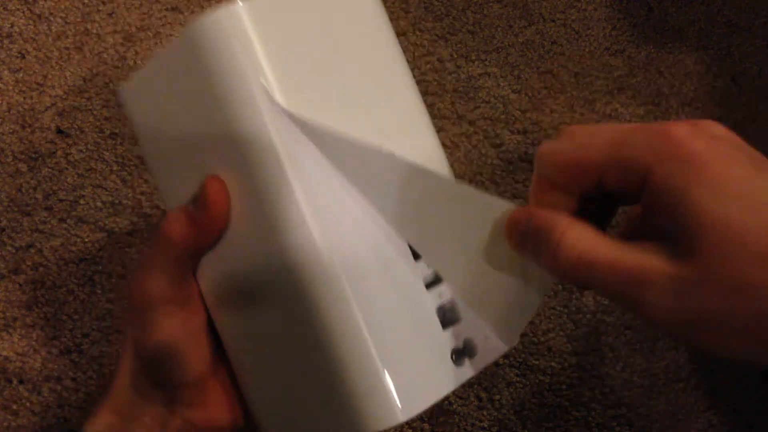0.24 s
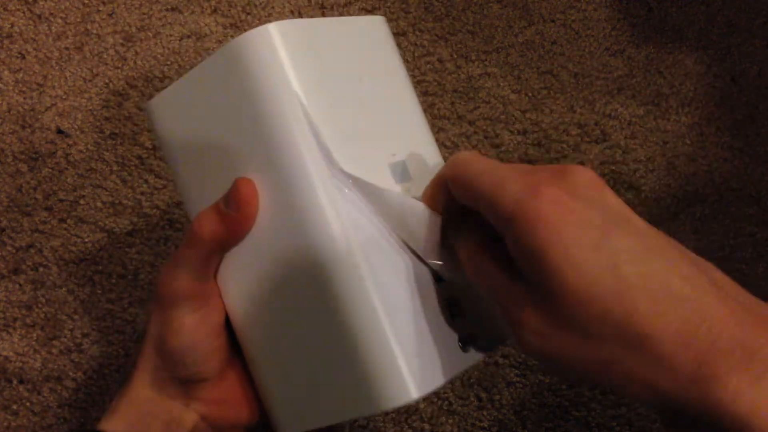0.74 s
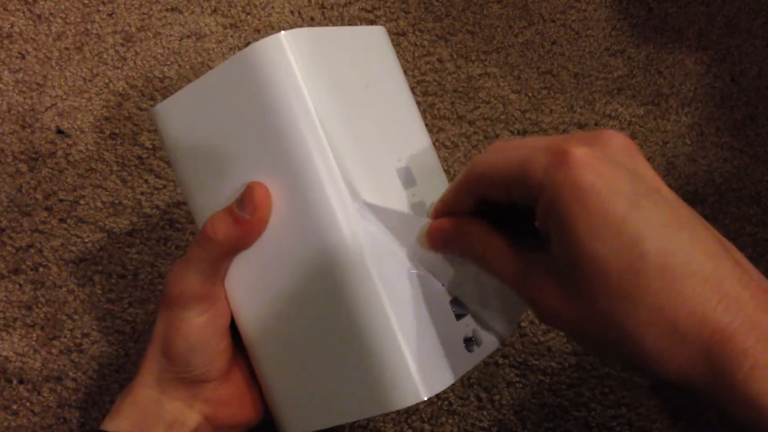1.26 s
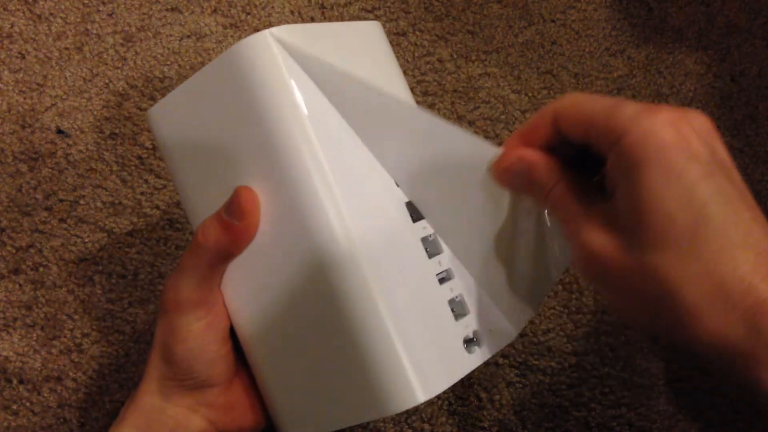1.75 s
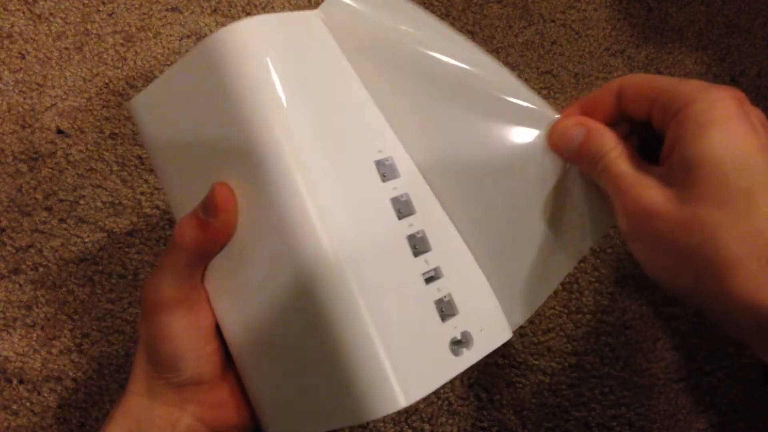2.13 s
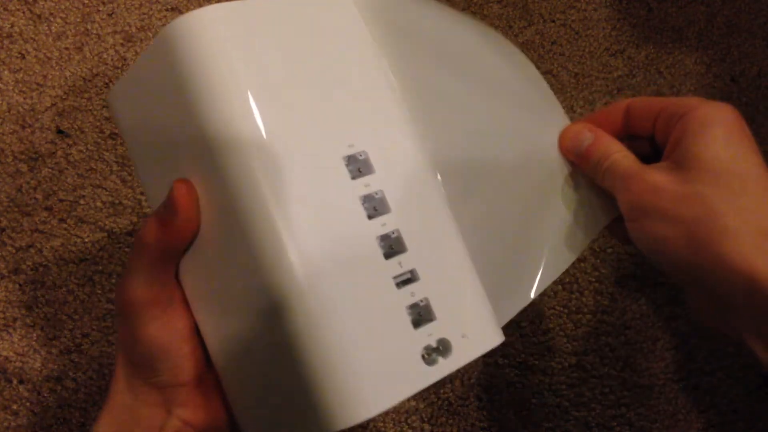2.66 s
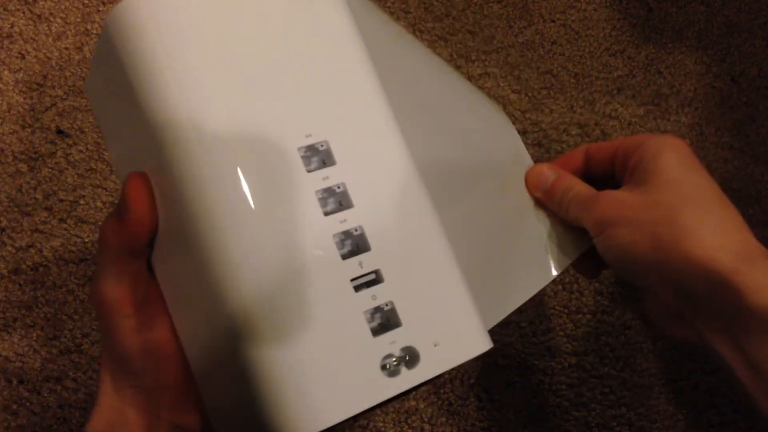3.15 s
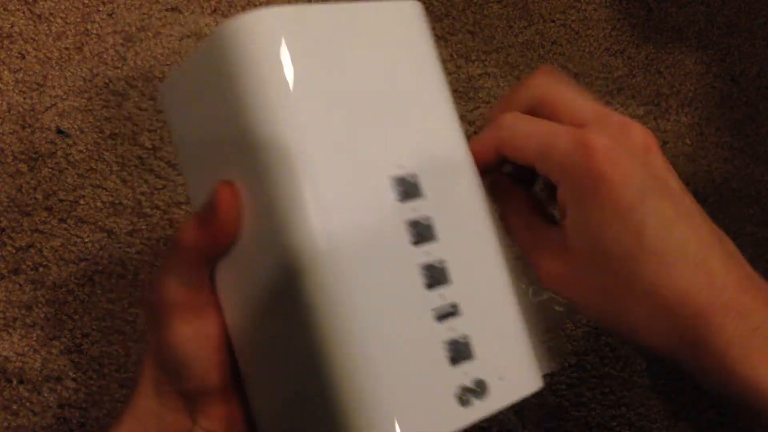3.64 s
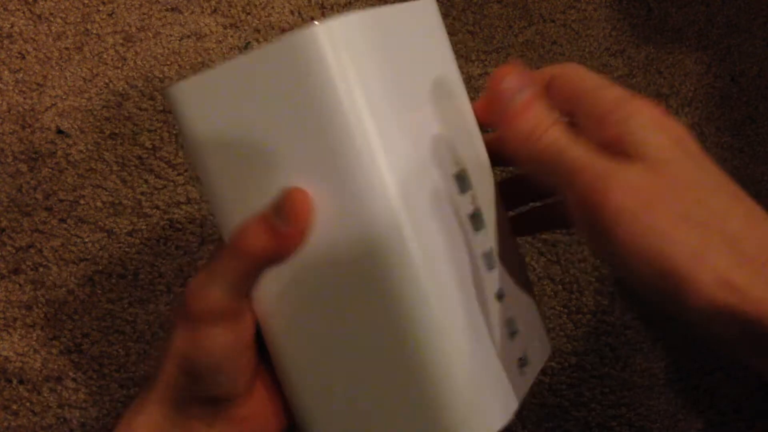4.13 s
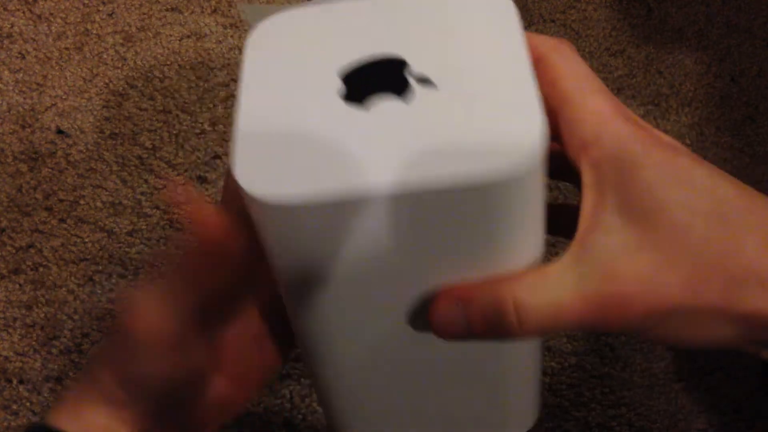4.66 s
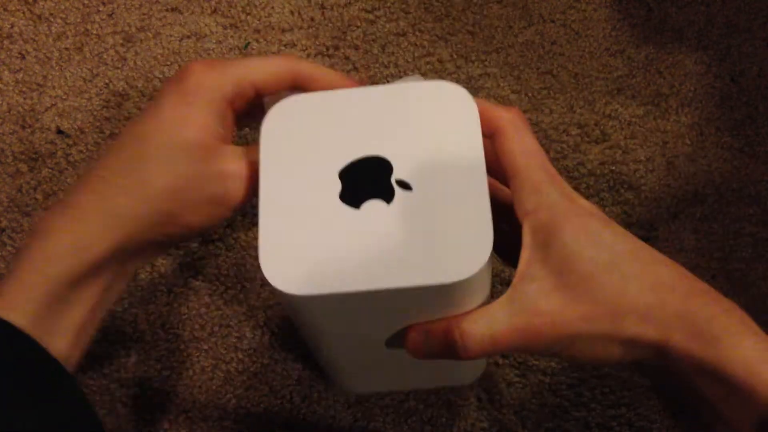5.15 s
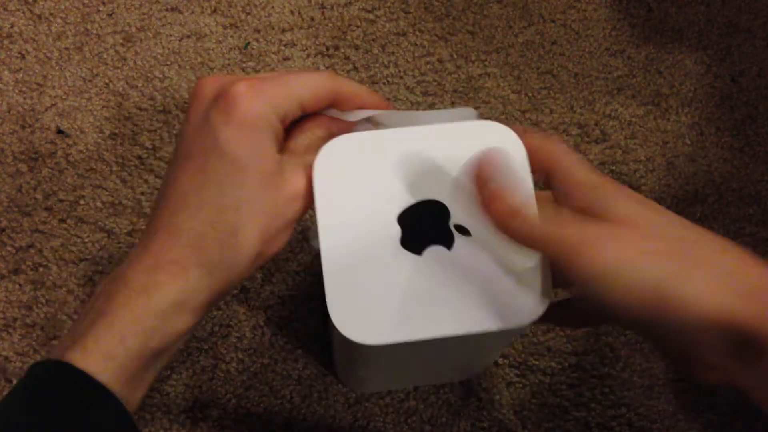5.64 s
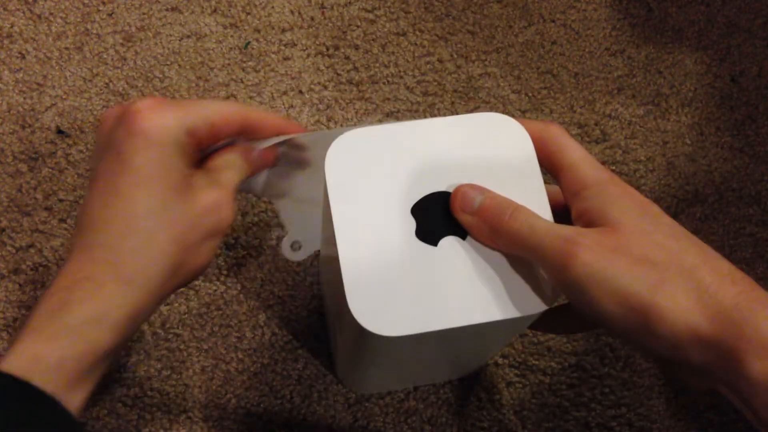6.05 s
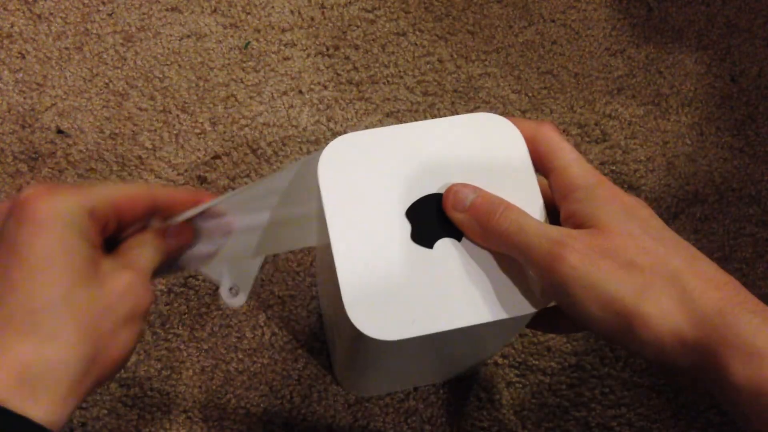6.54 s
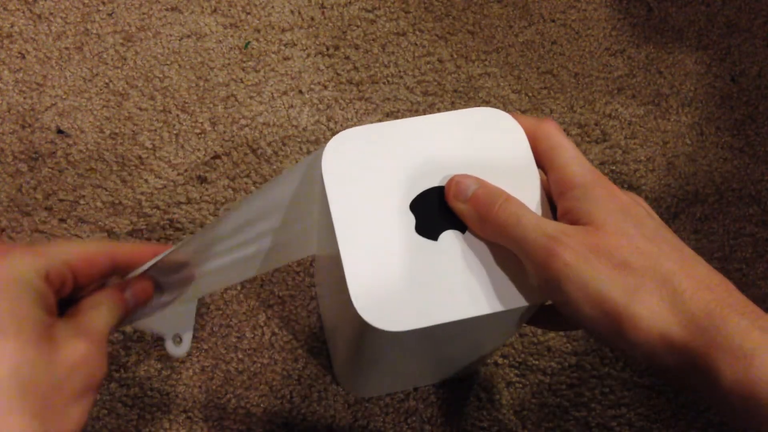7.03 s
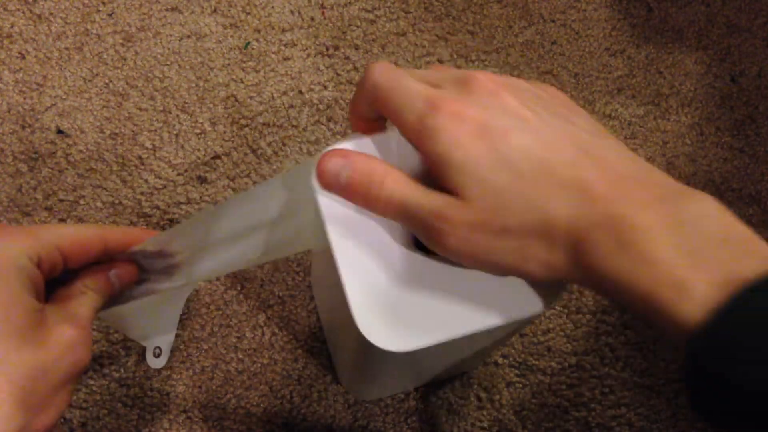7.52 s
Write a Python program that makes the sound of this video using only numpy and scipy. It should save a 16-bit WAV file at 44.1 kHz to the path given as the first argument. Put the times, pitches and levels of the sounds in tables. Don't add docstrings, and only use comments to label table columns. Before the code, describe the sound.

Sharp snaps and crinkles of protective plastic film coming off a hollow plastic case, with brief rubbing, quiet gaps and a faint peeling hiss indoors.

```python
import sys
import numpy as np
from scipy import signal
from scipy.fft import rfft, irfft, next_fast_len
from scipy.io import wavfile
from scipy.ndimage import uniform_filter1d, map_coordinates

SR = 44100
rng = np.random.default_rng(int(sys.argv[2]) if len(sys.argv) > 2 else 0)


def ratio(d):
    e = np.asarray(d, float) / 20
    return 10 ** e


def unload_audio(sound):
    columns = np.transpose(np.atleast_2d(sound))
    steps = np.round(np.clip(columns, -1, 1) * 32767)
    wavfile.write(sys.argv[1], SR, steps.astype(np.int16))


N = 343315

POPS = [
    (1.4092, 2.5, -8, -5.5),
    (2.5171, .5, -3.5, .3),
    (2.821, -1, -5, 3),
    (5.4479, -10, -17, 9),
    (6.2035, -3, -8, 6.5),
]
CRACKS = [(.5718, -7.5, -5, -16.5), (.7708, -23, 0, -17.5), (.8523, -22.5, 7.5, -10.5),
          (1.5161, -26, 13, -13.5), (1.9258, -10, -1, -12.5), (3.463, -17.5, -5.5, -13),
          (3.6613, -18, -8, -13.5), (3.8236, -38.5, -9, -10), (3.9762, -27, 20.5, -8), (4.5794, -47, 6, -7),
          (4.6537, -13.5, -21, -10.5), (5.4635, -10, -14, 0), (5.9294, -10.5, -16, -2),
          (6.1042, -31, -16, -12), (6.1951, -34, -10, -4), (6.4076, -15, -13, -4), (6.417, -28.5, -14, 9),
          (6.621, -45, -17, 19), (6.8121, -25.5, -8, -12), (7.2971, -27, -12.5, -6.5)]
SNAPS = [(.306, -49.5, 14, -13), (1.1096, -19.5, -6.5, -11.5), (1.1697, -42, 14.5, -24.5),
         (2.136, -9.5, -2, -17), (2.84, -26, -10, -4), (6.482, -22, 0, 12), (1.4165, -17, -4, -5),
         (1.441, -29, -2, -6), (3.4417, -23.5, 2, -12), (3.915, -30, 2, -16), (4.5471, -41, 1, -1),
         (5.0003, -36, 9, -16), (5.0081, -27, 4, -10), (5.0771, -13, -2.5, -26), (5.3129, -25, -3, -19.5),
         (5.4552, -20, -10, -3), (5.518, -31, -20, 3), (5.5635, -6, -16, -4), (5.6054, -11, -13, -2.5),
         (5.671, -14, -8, 1), (5.9028, -9.5, -12, 3.5), (6.4003, -6.5, -15, -4), (6.4476, -17.5, 5, -15.5),
         (6.5236, -23, -20, 6), (7.2353, -11.5, -11, -12), (7.4885, -27, -11, -11.5)]
THUMPS = [
    (.1973, -20, 0, -13.5),
    (.5978, -19, -7, -12),
    (1.2431, -28.5, 4, -12),
    (2.8742, -24, -9, -9),
    (5.7402, -19.5, -6, -20),
]
CRUNCHES = [(.3822, -36, 3.5, -8.5), (.579, -18, 0, -8), (.6293, -36, -4, -12), (.7042, -26, -1, -8),
            (.7178, -12.5, -3, -6), (.8835, -7, -9, -11), (.8896, -3.5, -8, -21),
            (.9179, -13.5, 2.5, -12.5), (.9338, -18, 2, -14), (1.03, -38, 4, -12.5), (1.085, -33, 10.5, 1),
            (3.43, -12.5, -2.5, -10.5), (4.069, -24, -10, -20), (4.8943, -1, -13, -13.5),
            (4.9179, -9, -13, -16), (4.9503, -14, -6, -21), (5.298, -9.5, -14, -15), (5.5376, -30, -3, -13),
            (5.6368, -9, -16, -12), (5.712, -31.5, 5, -13), (5.9445, -7, -14, -10),
            (5.9563, -10.5, -8.5, -28), (5.9792, -19, -15, -8), (6.1872, -39, -20, -4), (6.49, -33, 0, 11),
            (6.5118, -44.5, 1, 8.5), (6.7196, -46, 1, 10), (7.5958, -36.5, 6, -11)]
FOLDS = [(.7357, -29, -4, 3), (.843, -28, 0, -8), (2.5338, -21.5, -12, -21.5), (3.4117, -21.5, 1, -13),
         (3.6671, -8.5, 0, -19), (3.6975, -29, 5, -8), (3.702, -11, -4, -26), (4.6593, -18, -15, -11.5),
         (4.6956, -25.5, 1, -22), (4.7062, -36, 6, -7), (5.0251, -12, -12, -16), (5.0344, -21, 6, -17.5),
         (5.0636, -12.5, -5, -20), (5.269, -21, -6, -10), (5.6426, -16, -.4, -19), (5.7827, -27.5, 3, -8),
         (6.22, -13, -19.5, -8), (6.4304, -18, -20, -4), (6.6069, -43, -16, 8), (7.51, -34, 3, -14)]
TICKS = [(0.56, -46, 0, -9), (0.669, -39, 2, -5), (1.7646, -47.5, -10, 12), (2.494, -43.5, -13, -1.5),
         (4.1485, -47, 15, -11), (4.3068, -38, 7, -16), (4.3618, -35, 1, -18), (4.5562, -45, 18, -3),
         (5.119, -43, 9.5, -9), (5.3731, -32, -7, -14), (5.4358, -32, -11, -7), (5.8478, -28.5, -8, -22),
         (5.8906, -44, -3, 2), (6.0966, -39, -4, 5), (6.1201, -39, -17, 2), (6.1745, -30, 2, -16),
         (6.166, -36, -12, -2), (6.3334, -29.5, -9, -7.5), (6.3894, -32.5, -4, -4), (7.444, -38.5, -1, -6),
         (7.586, -38, -0.5, -6), (7.763, -40, -6, -4)]


def creases():
    # (rows, rattle t60/s, low end/dB under the body); pops must come first
    kinds = [(POPS, .0075, -6), (CRACKS, .015, -13), (SNAPS, .023, -8), (THUMPS, .026, 6),
             (CRUNCHES, .036, -11), (FOLDS, .055, -6), (TICKS, .014, -14)]
    low_per_body = .7
    return np.array([(s, db, under + low_per_body * body, body, bright, t60)
                     for rows, t60, under in kinds
                     for s, db, body, bright in rows])


CREASE_HZ = [40, 100, 480, 900, 1500, 4200, 10000, 13500, 15300]
# (f/Hz, width/Hz, level/dB)
SHEET = [(3500, 260, 4), (5610, 590, 3.5), (6970, 400, 5), (8260, 450, 4), (11600, 390, 2)]
# (f/Hz, width/Hz, level/dB)
PANELS = [
    [(1050, 250, 9), (2540, 350, 5), (3850, 450, 10), (5260, 350, 6), (6700, 400, 6), (9870, 600, 3)],
    [(2200, 500, 8), (3500, 400, 2), (5900, 900, 8), (8200, 800, 6), (11500, 1100, 6), (13700, 600, 6)],
    [(3450, 700, 7), (5400, 600, 5), (6790, 350, 4), (8400, 900, 8), (10100, 500, 4), (11800, 700, 4)],
    [(3200, 600, 3), (4600, 500, 2), (6000, 600, 2), (8300, 900, 4), (10500, 900, 3), (12500, 900, 3)],
    [(3630, 300, 4), (4910, 300, 5), (6900, 900, 8), (9000, 1100, 7), (11500, 800, 4), (13100, 500, 4)],
]


def crease_colours(rows, hz):
    colours = []
    for _, db, low, body, bright, _ in rows:
        dark, shiny = min(bright, 0), max(bright, 0)
        levels = [low - 30, low - 13, low + 1, (low + body) / 2 - 2.5, body + 1.5, 0,
                  bright, bright + .6 * dark - .6, bright - .6 * shiny + 1.2 * dark - 7]
        colours.append(along(list(zip(CREASE_HZ, levels)), hz) + db + 4.5)
    woken = rng.uniform(0.12, 1.15, (len(rows), len(SHEET)))
    woken[:len(POPS)] *= .3
    colours = np.array(colours) + woken @ humps(SHEET, hz)
    for pop, panel in enumerate(PANELS):
        colours[pop] += humps(panel, hz).sum(axis=0) - 1.7
    return colours


def rattles(life, size):
    t = np.arange(SR // 16) / SR
    after_slips = ratio(3.5 * rng.standard_normal((len(life), len(t) // 32 + 1)))
    uneven = after_slips.repeat(32, axis=1)[:, :len(t)]
    fall = uneven * (ratio(-60 * t / (0.99 * life)) + 0.15 * ratio(-60 * t / (5 * life)))
    rise = 1 - np.exp(-(t + 1 / SR) / life ** 2)
    rattle = rfft(rng.standard_normal(fall.shape) * fall * rise, size)
    return rattle / np.sqrt(uniform_filter1d(abs(rattle) ** 2, size=420))


def snaps(room_db):
    rows = creases()
    count, size, lead = len(rows), 12288, 64
    hz = np.fft.rfftfreq(size, 1 / SR)
    is_pop = (np.arange(count) < len(POPS))[:, None]
    life = rows[:, 5:]
    rattle = rattles(life, size)
    flip = np.where(is_pop, .84, np.clip(.95 - life / .05, 0, .7))
    lag = rng.uniform(.00015, .0011, (count, 3, 1))
    echo = np.where(is_pop, .12, .3)
    click = 0.8 + echo * ([-1, 1, -1] @ np.exp(-2j * np.pi * hz * lag))
    answer = rfft(np.pad(tails(count), ((0, 0), (120, 0))), size)
    wet_db = room_db + np.where(is_pop, -4, 0)
    snap = np.sqrt(flip) * click + np.sqrt(1 - flip) * rattle + ratio(wet_db) * answer
    heard = np.roll(irfft(snap * causal(crease_colours(rows, hz))), lead, axis=1)
    at = np.round(rows[:, :1] * SR).astype(int) - lead + np.arange(size)
    return np.bincount(at.ravel(), heard.ravel(), N)[:N]


# (t/s, peak level/dB, f/Hz, t60/s)
BOOMS = [(0.195, -38, 299, 0.094), (.197, -46, 520, .03), (.198, -50, 930, .06), (.198, -50, 1120, .11),
         (.198, -48, 1733, .08), (.198, -54, 2100, .05), (2.14, -54, 105, .08), (1.38, -62, 520, .02),
         (1.47, -60, 520, .04), (0.884, -37, 185, 0.035), (1.41, -27.5, 1013, 0.023),
         (1.409, -33, 3750, .03), (1.516, -48, 555, 0.05), (1.515, -42, 1830, 0.033),
         (2.14, -52, 360, 0.17), (.572, -35, 2250, .03), (6.204, -40, 600, .02), (.722, -48, 450, .03),
         (2.137, -43, 1900, .065), (2.138, -52, 1170, .1), (2.136, -46, 450, .03), (1.516, -47, 2250, .05),
         (1.518, -55, 1940, .08), (2.878, -52, 1250, .05), (2.875, -50, 2950, .04), (.653, -53, 260, .03),
         (.725, -54, 229, 0.061), (.93, -54, 170, .07), (2.518, -42.5, 221, 0.17), (2.518, -43, 542, 0.059),
         (3.108, -56.5, 590, 0.025), (3.67, -43, 400, 0.039), (4.6, -59, 70, .15), (4.895, -25, 5170, .03),
         (5.077, -39, 3670, .03), (5.741, -40.5, 252, 0.035), (5.943, -45, 160, 0.073),
         (6.402, -49, 248, 0.037), (6.401, -23, 7080, .06), (6.4, -24, 8630, .05), (1.409, -38, 2600, .03),
         (1.409, -30, 5230, .02), (6.417, -36, 7100, 0.15), (5.741, -42, 540, .025),
         (3.977, -43, 560, .025), (3.43, -45, 340, .03), (1.926, -47, 330, .03)]


def booms():
    u = np.arange(SR // 4) / SR
    out = np.zeros(N + SR)
    for s, db, hz, t60 in BOOMS:
        drift = uniform_filter1d(rng.standard_normal(len(u)), size=60)
        wander = 1 + .36 * np.clip(hz / 3000, 1, 3) * drift
        swing = np.sin(2 * np.pi * hz * np.cumsum(wander) / SR)
        soft_start = 1 - np.exp(-u * hz / 0.23)
        out[round(s * SR):][:len(u)] += ratio(db - 60 * u / t60) * swing * soft_start
    return out[:N]


EDGE_DB = -11
# (middle t/s, half length t/s, drag level/dB, crispness level/dB)
RUSTLE = [(.385, .015, -72, -4), (.42, .03, -80, 10), (.66, .02, -70, 0), (1.39, .02, -65, -2),
          (2.89, .03, -60, -12), (3.475, .03, -56, 0), (3.525, .025, -66, -20), (3.58, .03, -66, -17),
          (3.632, .025, -55, -8), (3.655, .008, -47, -2), (3.735, .015, -51, -4), (3.685, .05, -48.5, -10),
          (3.786, .012, -55, -3), (3.81, .04, -60, -8), (3.848, .015, -51, -10), (3.88, .025, -54, -15),
          (3.94, .04, -53, -11), (3.99, .04, -50, -3), (4.028, .032, -49.5, 1), (4.056, .016, -45, 4),
          (4.155, .025, -67, -10), (4.22, .05, -63, -12), (4.325, .035, -64, -10), (4.375, .025, -64, -3),
          (4.43, .035, -65, -8), (4.468, .015, -67, 0), (4.57, .045, -65, -6), (4.62, .025, -66, -6),
          (4.7, .05, -57, -9), (4.83, .03, -76, 12), (5.1, .03, -62, -12), (5.19, .025, -68, 3),
          (5.295, .03, -62, 11), (5.37, .03, -70, 3), (5.435, .02, -77, 14), (7.51, .04, -64, 5),
          (7.6, .04, -69, -4)]


def strokes():
    s, half, db, crisp_db = np.transpose(RUSTLE)
    u = (np.arange(0, N, 32)[:, None] / SR - s) / half + .25
    catch, let_go = 2.2, .85
    swell = ratio(EDGE_DB * np.where(u < 0, catch * u, let_go * u) ** 2)
    return [(swell @ ratio(level)).repeat(32)[:N] for level in (db, db + crisp_db)]


# (f/Hz, level/dB per Hz)
DULL = [(90, -40), (400, -4), (850, -5), (1700, -2), (2800, -2.5), (4500, -6.5), (7000, -35), (12000, -60)]
# (f/Hz, level/dB per Hz)
BRIGHT = [(1500, -34), (3000, -11), (4500, 0), (6500, -5.5), (9000, -16.5), (15000, -28)]


def rustle():
    clumps = ratio(2.5 * wobble(120))
    drag_gain, crinkle_gain = strokes()
    drag = clumps * crinkle(per_second=900, spread_db=3, noise=1.1)
    skin = ratio(-1.2) * coloured(drag, DULL)
    sheet = coloured(clumps * crinkle(per_second=1300, spread_db=4, noise=0.6), BRIGHT)
    return clumps * pockets() + ratio(-2.5) * drag_gain * skin + ratio(-3.5) * crinkle_gain * sheet


# (middle t/s, half length t/s, level/dB, f/Hz)
POCKETS = [(3.475, .03, -62, 1300), (3.525, .03, -66, 1300), (3.585, .012, -66, 1600),
           (3.61, .02, -70, 1300), (3.65, .03, -64, 420), (3.635, .02, -60, 1800), (3.656, .007, -50, 3400),
           (3.7, .015, -50, 2300), (3.735, .015, -55, 2400), (3.775, .02, -62, 2600), (3.81, .02, -70, 450),
           (2.9, .03, -68, 600), (3.81, .025, -64, 2800), (3.89, .008, -58, 3200), (3.68, .025, -57, 330),
           (3.97, .05, -60, 4200), (4.58, .005, -62, 2250), (3.848, .012, -58, 2400),
           (3.868, .012, -52, 1600), (3.888, .01, -53, 1800), (3.872, .03, -62, 3200),
           (3.922, .018, -51.5, 1500), (3.955, .025, -52.5, 1900), (3.95, .03, -60, 3000),
           (4.005, .015, -60, 700), (4.02, .015, -54, 4400), (4.06, .02, -52, 3300),
           (4.155, .013, -65, 2100), (4.165, .012, -67, 1700), (4.205, .02, -68, 2000),
           (4.25, .02, -70, 1550), (4.33, .02, -68, 2100), (4.368, .018, -65, 4300),
           (4.38, .012, -65, 1900), (4.43, .022, -72, 1600), (4.47, .015, -69, 3400),
           (4.565, .022, -67, 2100), (4.62, .015, -69, 2100), (4.67, .015, -60, 3200),
           (4.705, .02, -63, 1900), (4.75, .01, -66, 3100), (5.12, .008, -66, 1400),
           (5.195, .012, -69, 1650), (5.18, .03, -67, 3300), (5.3, .015, -50, 4600),
           (5.538, .008, -62, 1300),
           (.46, .006, -66, 2000), (.562, .004, -67, 3000), (.7145, .003, -50, 9000),
           (.737, .01, -54, 13000), (.878, .006, -54, 4000), (.89, .009, -39, 6000), (.9, .03, -60, 260),
           (.96, .02, -62, 5000), (1.403, .006, -60, 1100), (2.817, .003, -64, 6000),
           (6.196, .003, -48, 7300), (7.2, .005, -66, 10000)]


def pockets():
    out = np.zeros(N + SR)
    u = np.arange(-SR // 12, SR // 12) / SR
    for s, half, db, hz in POCKETS:
        width = .24 * hz
        flutter = rng.standard_normal((2, len(u)))
        for turns in (1, 2):
            flutter = signal.lfilter([1], [1, -np.exp(-turns * np.pi * width / SR)], flutter)
        phase = 2 * np.pi * hz * u
        band = unit(flutter[0] * np.cos(phase) + flutter[1] * np.sin(phase))
        swell = ratio(db - 1.5 + .7 * EDGE_DB * (u / half) ** 2)
        out[round((s + u[0]) * SR):][:len(u)] += swell * band
    return out[:N]


def patchy(x):
    z = signal.stft(x, nperseg=256)[2]
    field = uniform_filter1d(rng.standard_normal(z.shape), size=4, axis=0)
    field = uniform_filter1d(field, size=4, axis=1)
    return signal.istft(z * ratio(2.6 * unit(field) - 1), nperseg=256)[1][:N]


# (t/s, level/dB)
PEEL = [
    [(5.98, -62.5), (6.052, -65), (6.17, -63), (6.26, -68), (6.3, -71), (6.335, -66), (6.37, -73),
     (6.39, -68)],
    [(6.5, -64.5), (6.68, -61), (6.8, -61.5), (6.96, -63), (7.04, -61), (7.13, -61.5), (7.17, -65),
     (7.22, -71)],
]
# (f/Hz, level/dB per Hz)
GLUE = [(600, -30), (1140, -6), (1720, -5), (2730, -7), (3430, -4.5), (6690, -1), (10500, -5),
        (15000, -16.5)]
# (f/Hz, width/Hz, level/dB)
TAUT = [(2080, 200, 2), (3550, 300, 2), (4900, 450, 3.5), (6600, 450, 3.5), (7600, 300, 2)]


def peel():
    unsteady = ratio(.6 * wobble(23) + 1.2 * wobble(150))
    drag = crinkle(per_second=2500, spread_db=2.6, noise=0.6) * unsteady
    edge = ratio(-16 + 2.2 * wobble(30)) * coloured(drag, BRIGHT)
    hz = np.arange(500, 16000, 50)
    sung = along(GLUE, hz) + humps(TAUT, hz).sum(axis=0)
    pull = sum(ratio(curve(span) - 1.1) for span in PEEL)
    return pull * (coloured(drag, np.transpose([hz, sung])) + edge)


# (f/Hz, t60/s)
ROOM = [(300, 0.28), (1500, 0.16), (5000, 0.14), (10000, .15), (15000, 0.14)]


def tails(count):
    hz, t, z = signal.stft(rng.standard_normal((count, SR // 5)), SR, nperseg=128)
    fall = ratio(-60 * t / along(ROOM, hz)[:, None])
    tail = signal.istft(z * fall, SR, nperseg=128)[1]
    return tail / np.linalg.norm(tail, axis=1, keepdims=True)


# (f/Hz, level/dB per Hz)
HISS = [(15, -60), (25, -29), (43, -7), (112, -1.5), (280, -5.5), (430, -9.5), (534, -11), (661, -15),
        (913, -17), (1370, -18), (1880, -18.5), (2210, -15.5), (10200, -16), (15300, -18.5)]
# (t/s, level/dB)
GAIN = [(0, -0.5), (2.5, 0.5), (2.6, -4), (2.82, 1.5), (2.9, -4.5), (3.4, -3), (4.2, -3), (5, 2.5),
        (7.2, -1.5), (7.78, 0)]


def floor():
    hum = ratio(-80 + 2.1 * wobble(5.2)) * np.sin(2 * np.pi * 59 * np.arange(N) / SR)
    hiss = ratio(-67) * coloured(rng.standard_normal(N), HISS)
    return (hiss + hum) * ratio(curve(GAIN, off=0))


def crinkle(per_second, spread_db, noise):
    size_db = spread_db * np.minimum(rng.exponential(size=N), 3)
    happens = rng.random(N) < per_second / SR
    slips = happens * ratio(size_db) * np.sign(rng.standard_normal(N))
    return unit(slips) + noise * rng.standard_normal(N)


def coloured(x, spectrum):
    m = next_fast_len(N + 8192)
    gain = ratio(along(spectrum, np.fft.rfftfreq(m, 1 / SR)))
    return unit(irfft(rfft(x, m) * gain, m)[:N])


def humps(modes, hz):
    return np.array([db * np.exp(-((hz - centre) / width) ** 2) for centre, width, db in modes])


def causal(gain_db):
    cepstrum = irfft(gain_db * np.log(10) / 20)
    half = cepstrum.shape[1] // 2
    cepstrum[:, 1:half] *= 2
    cepstrum[:, half + 1:] = 0
    return np.exp(rfft(cepstrum))


def unit(x):
    return x / np.sqrt(np.mean(x ** 2) + 1e-20)


def along(points, hz):
    f, v = np.transpose(points)
    return np.interp(np.log(hz + 1), np.log(f + 1), v)


def curve(rows, off=-120):
    t, db = np.transpose(rows)
    return np.interp(np.arange(N) / SR, t, db, off, off)


def wobble(rate):
    knots = rng.standard_normal(int(N * rate / SR) + 4)
    return map_coordinates(knots, [np.arange(N) * rate / SR])


def scene():
    friction = patchy(rustle()) + peel()
    wet = ratio(-13) * signal.fftconvolve(friction, tails(count=1)[0])[:N]
    mix = snaps(room_db=-15) + booms() + friction + wet + floor()
    return mix[None]


def band_limit(x):
    return signal.sosfilt(signal.butter(12, 16550, fs=SR, output="sos"), x)


def record(dry):
    m = next_fast_len(N)
    over = np.clip((np.fft.rfftfreq(m, 1 / SR) - 15190) / 380, 0, 1)
    keep = ratio(-29 * np.sin(over * np.pi / 2) ** 2)
    mix = irfft(rfft(dry, m) * keep, m)[:, :N]
    return band_limit(mix)


dry = scene()
out = record(dry)
unload_audio(out)
```